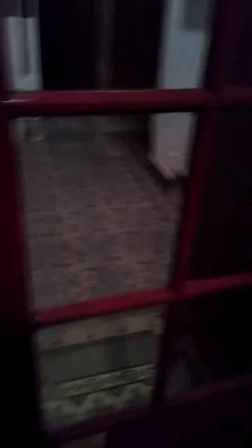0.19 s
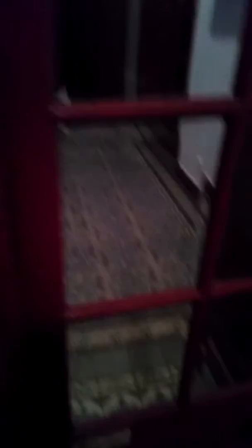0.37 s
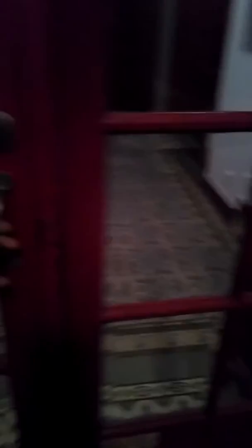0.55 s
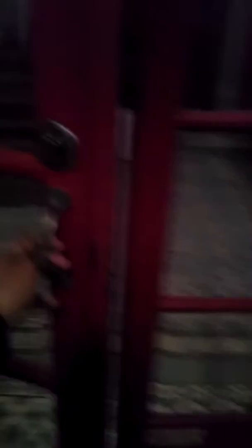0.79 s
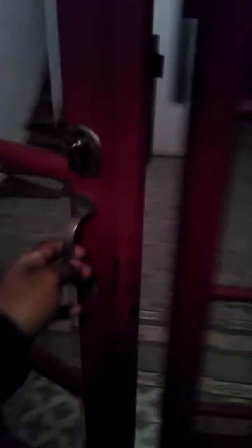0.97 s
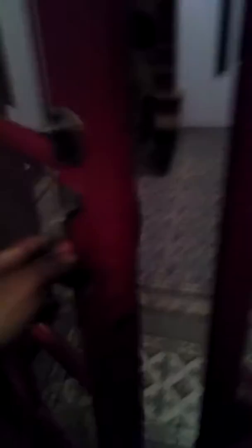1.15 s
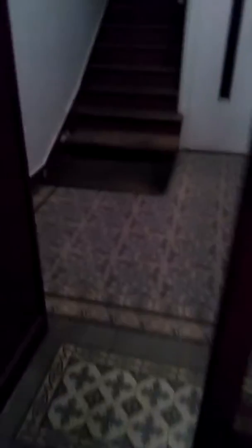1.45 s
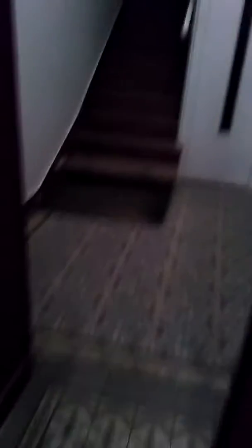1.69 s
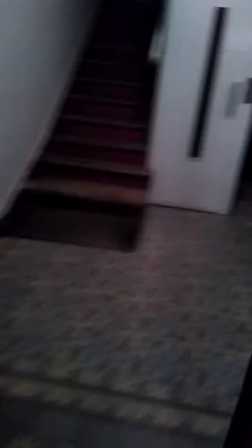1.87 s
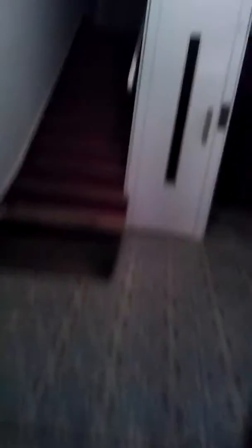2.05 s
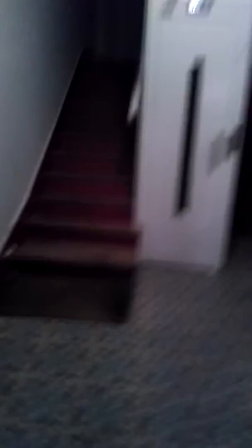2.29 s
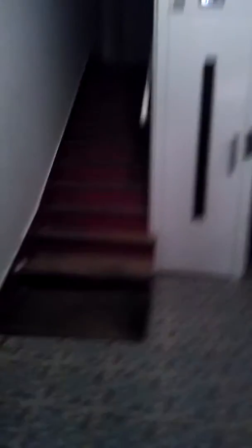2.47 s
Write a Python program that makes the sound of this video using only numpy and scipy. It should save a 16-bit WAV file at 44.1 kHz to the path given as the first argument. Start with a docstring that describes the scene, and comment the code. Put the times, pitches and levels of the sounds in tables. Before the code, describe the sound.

An old elevator's metal gate bangs in an echoing stone stairwell, caught close by a hand-held phone. Handle and bolt rattle from 0 to 0.1 s with a latch snap; the overloaded bang hits at 0.2 s, with small rebounds until 0.35 s, deep booms and ringing decay. Clothes swish and a hinge rubs faintly; a latch snaps at 1.7 s, then air buffets the microphones and a soft step lands around 2.3 s.

```python
"""A faint building background runs throughout. By a hand-held phone in a stone stairwell, the handle and
bolt of an old elevator's metal gate rattle, a latch snaps, and the gate bangs and rings on, with deep booms.
Clothes swish, the swinging door's hinge rubs faintly and a latch snaps again; then air buffets
the microphones, a sole slides and a soft foot lands. Metal is noise bursts with echoes plus decaying sines;
the rest is filtered noise that swells and fades. The bang overloads the recorder."""
import sys
import numpy as np
from scipy import signal
from scipy.fft import rfft, irfft
from scipy.io import wavfile
from scipy.ndimage import uniform_filter1d

SR = 44100
rng = np.random.default_rng(int(sys.argv[2]) if len(sys.argv) > 2 else 0)


def wrap_up_sound(samples):
    """Save the sound to the file named by the first command line argument, as 16-bit audio."""
    columns = np.atleast_2d(samples).T
    # keep every value between -1 and 1, then stretch to whole-number steps
    tamed = np.clip(columns, -1, 1)
    steps = np.round(tamed * 32767).astype(np.int16)
    wavfile.write(sys.argv[1], SR, steps)


N = 114660
T = np.arange(N) / SR  # time/s
FREQS = np.fft.rfftfreq(2 * N, 1 / SR)  # f/Hz, padded to twice the length

# Below, levels are relative; rise and fall set how wide a swell is on each side of its peak.
# Background of the building: [f/Hz, level per Hz/dB]
BACKGROUND_COLOUR = [(25, -5), (55, 3), (120, -8), (260, -6.5), (500, -12.5), (900, -17.5), (2000, -21),
                     (3000, -25.5), (4800, -31), (7000, -27.5), (10000, -22), (14000, -33)]
BACKGROUND_DB = -56

# Handle and bolt rattling before the bang: [t/s, level/dB, attack/s, crash t60/s]
RATTLE_BLOWS = [(.0065, -26.5, 0.018, .03), (.031, -28.5, 0.0035, .04), (.0772, -17.5, 0.0025, .025)]
# Colour of the rattle: [f/Hz, level per Hz/dB]
RATTLE_COLOUR = [(30, 1), (70, 3.5), (170, 5), (450, 0), (1300, 0), (1700, -2), (2500, 0), (4000, -1.5),
                 (7000, -6), (10500, -5), (12000, -6.5), (14000, -21)]
# Ringing of the handle and bolt: [f/Hz, level/dB, t60/s]
RATTLE_MODES = [(1267, 9, 0.26), (2260, 1.5, .2), (3120, -2, 0.22), (10040, 8, 0.024)]
RATTLE_RING_DB, RATTLE_DIRECT_DB, RATTLE_PAN_DB = -21, -4.5, 0.5  # pan: left minus right

# Latches snapping: [t/s, level/dB, attack/s, crash t60/s]
LATCH_BLOWS = [(.0668, -23.5, 0.0017, .014), (1.7068, -21, 0.0013, 0.029), (1.7125, -39, .002, 0.036)]
# Colour of the snap: [f/Hz, level per Hz/dB]
LATCH_COLOUR = [(40, -4.5), (300, -15.5), (470, -2), (700, -12.5), (950, -1), (1200, -2.5), (1500, -6.5),
                (2100, 1), (2700, -2.5), (3300, -10.5), (5300, -2.5), (6500, -8), (8300, -1.5),
                (10000, -1.5), (11500, -3), (14000, -7)]
# Ringing of the latch: [f/Hz, level/dB, t60/s]
LATCH_MODES = [(478, -6, 0.62), (1022, -2.5, 0.32), (1810, -0.5, .35), (1900, 2.5, 0.75), (2130, 2, 0.47),
               (2580, -2.5, .3), (8090, 7.5, 0.03), (11430, 10, .012), (12040, 5.5, 0.01)]
LATCH_RING_DB, LATCH_DIRECT_DB, LATCH_PAN_DB = -18.5, -4, 1.5

# Air pushed by the gate and the cabin booming: [peak t/s, rise/s, fall/s, f/Hz, width/Hz, level/dB]
BOOMS = [(0.13, 0.061, .05, 28, 40, -28.5), (0.15, 0.039, .04, 36, 33, -25.5),
         (.43, 0.06, 0.089, 71, 30, -33), (0.3, 0.099, 0.28, 170, 35, -32.5),
         (1.15, .4, .6, 255, 25, -60.5)]

# Gate hitting its frame and rebounding: [t/s, level/dB, attack/s, crash t60/s]
GATE_BLOWS = [(.2076, -9, 0.00056, 0.046), (.2141, 4.5, .0004, 0.022), (.292, -14, 0.00033, 0.022),
              (.318, -14, 0.0014, 0.017), (.347, -15.5, .0015, 0.018)]
# Colour of the gate's crack: [f/Hz, level per Hz/dB]
GATE_COLOUR = [(30, -24.5), (60, -17.5), (130, -14), (240, -15.5), (330, -10.5), (600, -5.5), (850, -6),
               (1100, -4.5), (1700, -2), (2900, 0.5), (3700, -5), (5800, -8), (10000, -9), (12000, -11),
               (14000, -17)]
# Ringing bars and panels: [f/Hz, level/dB, t60/s]
GATE_MODES = [(312, -3.5, 0.96), (786.6, -1, 1.0), (903, -5, 1.0), (1026, -5.5, 1.5), (1290, 2.5, 1),
              (1388, -2, 1), (1630, -1, 0.51), (1930, 3.5, 1), (2046, -3.5, 0.52), (2234, -1.5, .7),
              (2410, -4.5, 0.63), (2696, -5, 1), (2990, -1, 1), (3260, -2.5, 0.43)]
GATE_RING_DB, GATE_DIRECT_DB, GATE_PAN_DB = -20.5, -6.5, -2

# Clothes swishing: [peak t/s, rise/s, fall/s, level/dB]
SWISHES = [(.83, 0.058, 0.13, -49.5), (1.17, .13, 0.18, -59.5), (1.53, 0.031, 0.15, -49.5),
           (2.17, 0.14, 0.14, -50), (2.44, 0.14, 0.15, -59)]
# Colour of the fabric: [f/Hz, level per Hz/dB]
SWISH_COLOUR = [(200, -36), (700, 2), (1500, -23), (2800, -16), (4800, -13), (6200, -6), (7200, -1.5),
                (10000, -1), (12000, -6), (14000, -4)]

# Hinge rubbing as the door swings: [peak t/s, rise/s, fall/s, f/Hz, width/Hz, level/dB]
HINGE_RUBS = [(1.26, 0.9, .1, 2850, 170, -62), (1.42, 0.62, 0.52, 870, 49, -64),
              (1.393, 0.092, 0.071, 1400, 230, -66.5)]

# Air buffeting the microphone ports: [peak t/s, rise/s, fall/s, f/Hz, left level/dB, right level/dB]
PUFFS = [(1.768, 0.011, 0.021, 74, -68, -29), (1.842, .012, 0.01, 68, -40, -43),
         (1.958, 0.0094, 0.018, 117, -31.5, -38.5), (1.988, .012, 0.021, 66, -29.5, -38),
         (2.053, 0.009, 0.018, 61.6, -42, -34), (2.14, .05, .04, 48, -50, -48),
         (2.217, 0.045, 0.05, 73.6, -33.5, -55), (2.354, 0.025, 0.025, 67, -39.5, -48),
         (2.47, 0.044, 0.07, 74.5, -48.5, -48.5)]
PUFF_WIDTH = 1  # share of the centre frequency, before the filter is applied twice

# Sole sliding and soft footfall: [peak t/s, rise/s, fall/s, f/Hz, width/Hz, level/dB]
FOOT = [(2.21, 0.094, 0.13, 3040, 3450, -58.5), (2.33, 0.053, 0.19, 282, 180, -48.5),
        (2.42, 0.093, 0.11, 131, 60.5, -47)]

# Base decay time of the stairwell, scaled by the shares below: [f/Hz, t60/s]
STAIR_T60 = [(60, 3), (150, 0.92), (300, 1.39), (900, 0.98), (2500, 0.88), (4000, 0.75), (7000, 0.6),
             (10000, 0.49), (14000, 0.25)]
STAIR_TAIL, LATCH_TAIL = 0.97, 0.92  # shares of that time for gate and handle, and for the latch
STAIR_BUILD_S = 0.0012
PORT_GAP_M, PORT_LAG_S = 0.13, .0002  # gap between microphone ports; direct sound is later at right

# Left minus right sensitivity: [f/Hz, level/dB]
BALANCE_DB = [(100, 2), (380, 2.5), (620, -0.5), (1100, 4.5), (2300, 7), (4200, 2), (6000, 0.5),
              (8500, 8.5), (11000, 14.5), (13000, 7)]
# Top edge of the recorder: [f/Hz, level/dB]
TOP_EDGE = [(11500, 0), (12800, 0), (14000, -6)]
CLIP_KNEE = 11  # hardness of the overload
TOP_HZ = 14200  # final treble cut


def undb(db):
    """Turn decibels into gain."""
    return 10 ** (np.asarray(db) / 20)


def curve(points, hz=FREQS):
    """Read (frequency, value) points on a log-frequency axis."""
    f, value = np.array(sorted(points), float).T
    return np.interp(np.log(np.maximum(hz, 1)), np.log(f), value)


def shape(x, gain):
    """Filter by a gain per frequency, without delay."""
    return irfft(rfft(x, 2 * N) * gain)[..., :N]


def causal(db):
    """Minimum-phase response of a dB curve, so that nothing sounds before a hit."""
    cepstrum = irfft(np.log(undb(db)))
    # Fold the half before time zero onto the half after it.
    cepstrum[1:N] *= 2
    cepstrum[N + 1:] = 0
    return np.exp(rfft(cepstrum))


def band(hz, width):
    """Gain of a resonance with steep skirts."""
    return 1 / (1 + ((FREQS ** 2 - hz ** 2) / (width * (FREQS + 1))) ** 2)


def rms(x):
    """Root-mean-square level of a sound."""
    return np.sqrt(np.mean(x ** 2))


def unit(x):
    """Scale to rms 1."""
    return x / rms(x)


def decay(t60):
    """Fall of 60 dB in t60 seconds."""
    return np.exp(-np.log(1000) * T / t60)


def swell(peak, rise, fall):
    """Smooth rise and fall about a moment."""
    side = np.where(T < peak, rise, fall)
    return np.exp(1 - np.hypot(1, 2 * (T - peak) / side))


def diffuse():
    """Noise arriving from all sides at two ports: alike in the bass, unrelated above."""
    alike = np.sinc(2 * FREQS * PORT_GAP_M / 343)  # 343 m/s is the speed of sound
    mid, side = shape(rng.standard_normal((2, N)), np.sqrt([1 + alike, 1 - alike]))
    return unit(np.array([mid + side, mid - side]))


def resonances(rows):
    """Softly driven resonances that swell and fade, blurred by the walls."""
    out = np.zeros((2, N))
    for peak, rise, fall, hz, width, db in rows:
        drive = swell(peak, rise, fall)
        tone = drive * shape(diffuse(), band(hz, width))
        out += undb(db) * unit(tone) * rms(drive)
    return out


def stairwell(tail):
    """Dense echoes off stone; the treble dies first."""
    centres = np.geomspace(40, 16000, 15)  # overlapping bands, each with its own decay
    noise = rfft(diffuse(), 2 * N)
    out = np.zeros((2, N))
    for hz, weights in zip(centres, np.eye(len(centres))):
        echoes = irfft(noise * curve(zip(centres, weights)))[:, :N]
        out += echoes * decay(tail * curve(STAIR_T60, hz))
    build = 1 - np.exp(-T / STAIR_BUILD_S)
    return unit(out * build) / np.sqrt(N)


def crash(attack, t60, colour):
    """A burst of countless short metal modes, evened out to the given colour."""
    envelope = decay(t60) * (1 - np.exp(-T / attack))
    burst = rfft(rng.standard_normal(N) * envelope, 2 * N)
    lumps = 10 * np.log10(uniform_filter1d(np.abs(burst) ** 2, size=500))
    return unit(irfft(burst * causal(curve(colour) - lumps))[:N])


def struck(blows, colour, modes, room, ring_db, direct_db, pan_db):
    """Metal on metal: short dense crashes, heard directly and off the walls, leave modes ringing close by."""
    ring = np.zeros((2, N))
    for hz, db, t60 in modes:
        phase = rng.random((2, 1))  # differs at each port
        ring += undb(db) * unit(np.sin(2 * np.pi * (hz * T + phase)) * decay(t60))
    crashes, ringing = np.zeros(N), np.zeros((2, N))
    for t, db, attack, t60 in blows:
        start, force = int(t * SR), undb(db) / 20
        crashes[start:] += force * crash(attack, t60, colour)[:N - start]
        ringing[:, start:] += force * ring[:, :N - start]
    right = np.interp(T - PORT_LAG_S, T, crashes)
    direct = np.array([crashes * undb(pan_db / 2), right * undb(-pan_db / 2)])
    echoes = signal.fftconvolve(crashes[None], room, axes=1)[:, :N]
    return undb(direct_db) * direct + undb(ring_db) * ringing + echoes


def background():
    """Steady noise of the building, arriving from all sides."""
    return undb(BACKGROUND_DB) * unit(shape(diffuse(), undb(curve(BACKGROUND_COLOUR))))


def handle_rattle(room):
    """Handle and bolt knock and ring briefly."""
    return struck(RATTLE_BLOWS, RATTLE_COLOUR, RATTLE_MODES, room,
                  RATTLE_RING_DB, RATTLE_DIRECT_DB, RATTLE_PAN_DB)


def latch_snaps():
    """Latches snap, with slightly shorter echoes than the gate."""
    return struck(LATCH_BLOWS, LATCH_COLOUR, LATCH_MODES, stairwell(LATCH_TAIL),
                  LATCH_RING_DB, LATCH_DIRECT_DB, LATCH_PAN_DB)


def booms():
    """Pushed air and the cabin boom as low resonances."""
    return resonances(BOOMS)


def gate_bang(room):
    """The gate hits its frame and rebounds; its bars and panels ring."""
    return struck(GATE_BLOWS, GATE_COLOUR, GATE_MODES, room,
                  GATE_RING_DB, GATE_DIRECT_DB, GATE_PAN_DB)


def clothes():
    """Fabric hisses with each move."""
    effort = sum(undb(db) * swell(peak, rise, fall) for peak, rise, fall, db in SWISHES)
    return effort * unit(shape(diffuse(), undb(curve(SWISH_COLOUR))))


def hinge_rub():
    """The rubbing hinge softly drives a few resonances."""
    return resonances(HINGE_RUBS)


def buffeting():
    """Short eddies of air, different at each port."""
    out = np.zeros((2, N))
    for peak, rise, fall, hz, *levels in PUFFS:
        gust = swell(peak, rise, fall)
        for port, db in enumerate(levels):
            eddy = shape(gust * rng.standard_normal(N), band(hz, PUFF_WIDTH * hz) ** 2)
            out[port] += undb(db) * unit(eddy) * rms(gust)
    return out


def footfall():
    """A sliding sole hisses, then a soft step thuds low."""
    return resonances(FOOT)


def scene():
    """Add all sounds; handle and gate share one set of stairwell echoes."""
    room = stairwell(STAIR_TAIL)
    metal = handle_rattle(room) + latch_snaps() + gate_bang(room)
    movement = clothes() + hinge_rub() + buffeting() + footfall()
    return background() + metal + booms() + movement


def record(dry):
    """Two unequal microphones of opposite polarity; the peaks overload and the top is cut."""
    half = curve(BALANCE_DB) / 2
    sensitivity = np.array([undb(half), -undb(-half)])
    x = shape(dry, sensitivity * undb(curve(TOP_EDGE)))
    x = x / (1 + np.abs(x) ** CLIP_KNEE) ** (1 / CLIP_KNEE)
    top_cut = signal.ellip(8, .2, 70, TOP_HZ, fs=SR, output="sos")
    return signal.sosfilt(top_cut, x)


dry = scene()
out = record(dry)
wrap_up_sound(out)
```